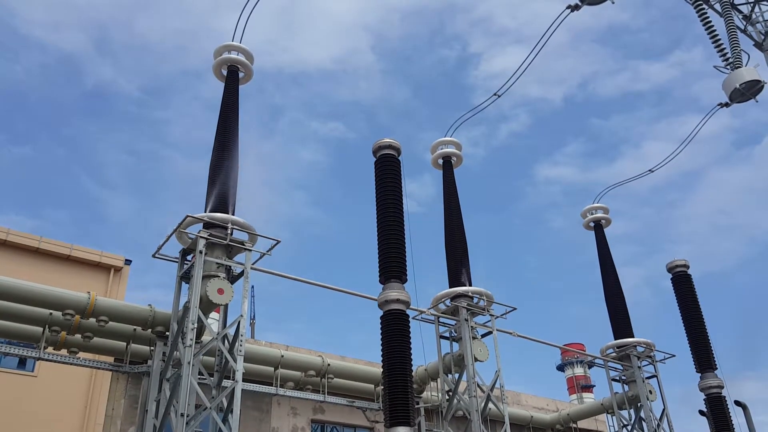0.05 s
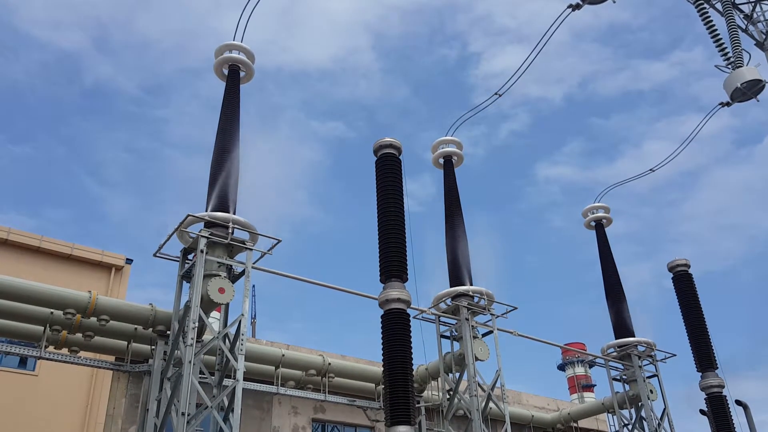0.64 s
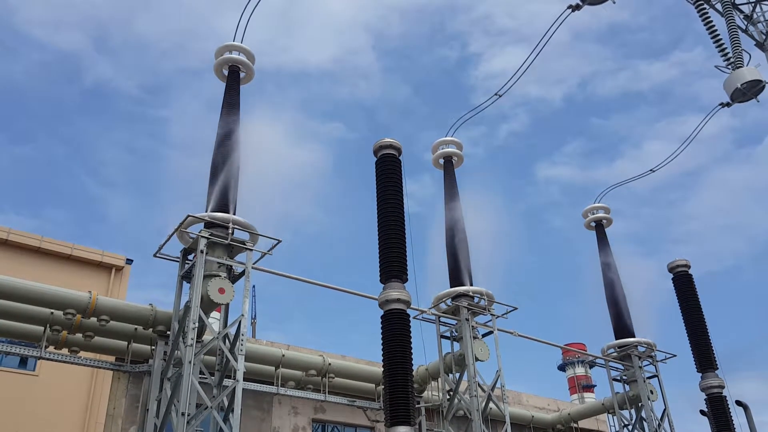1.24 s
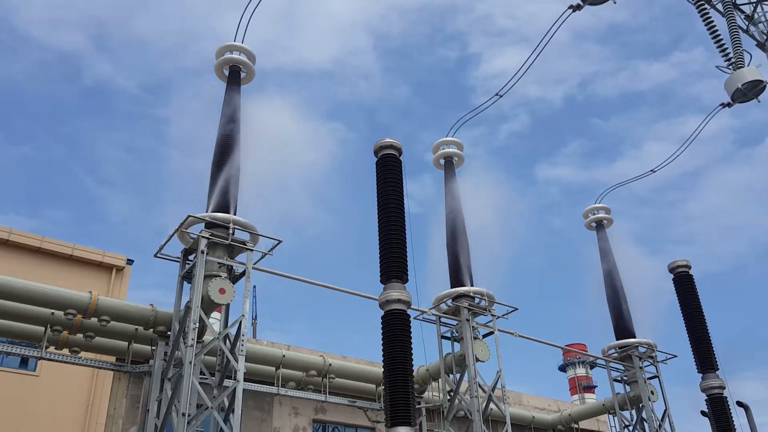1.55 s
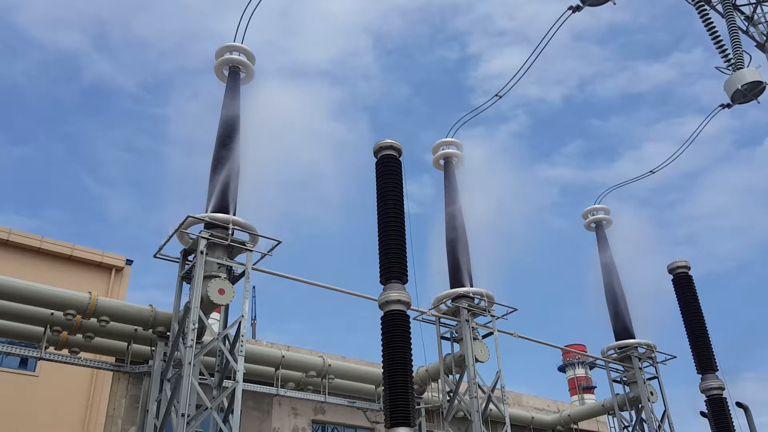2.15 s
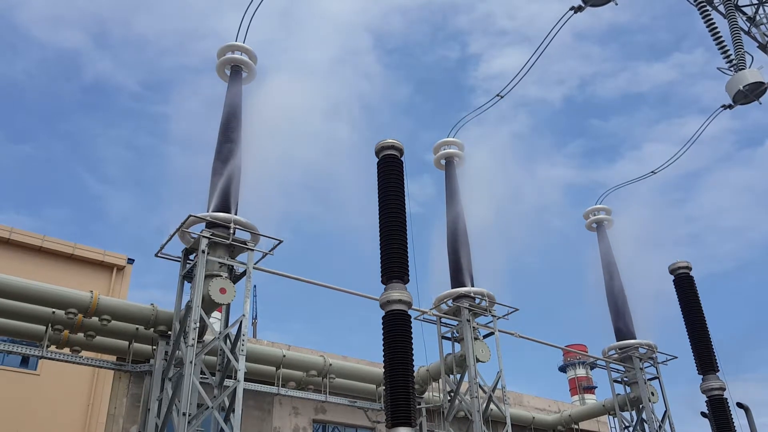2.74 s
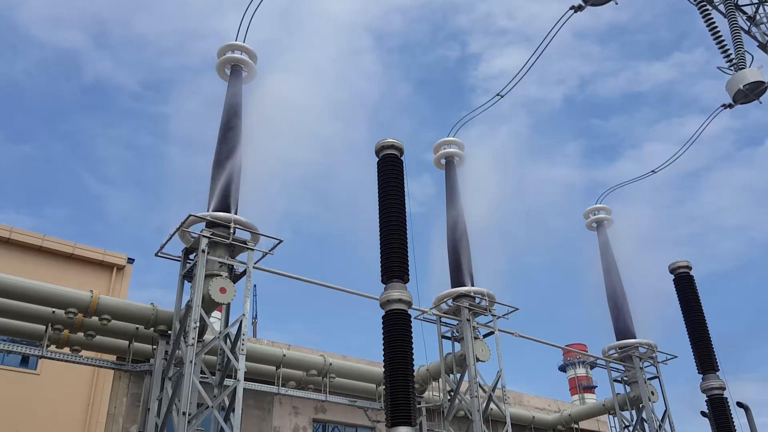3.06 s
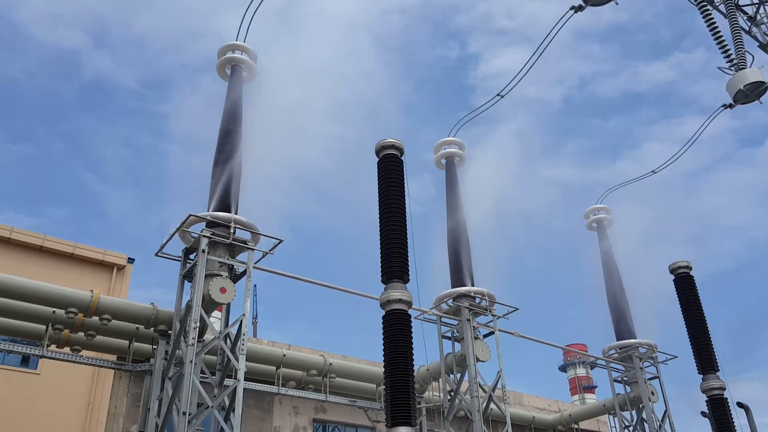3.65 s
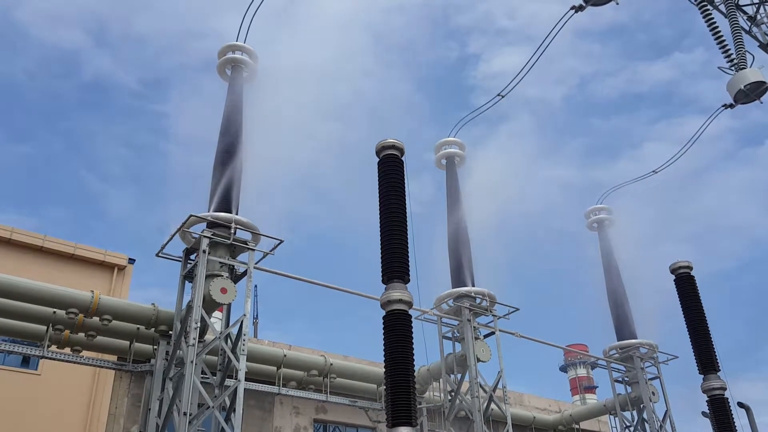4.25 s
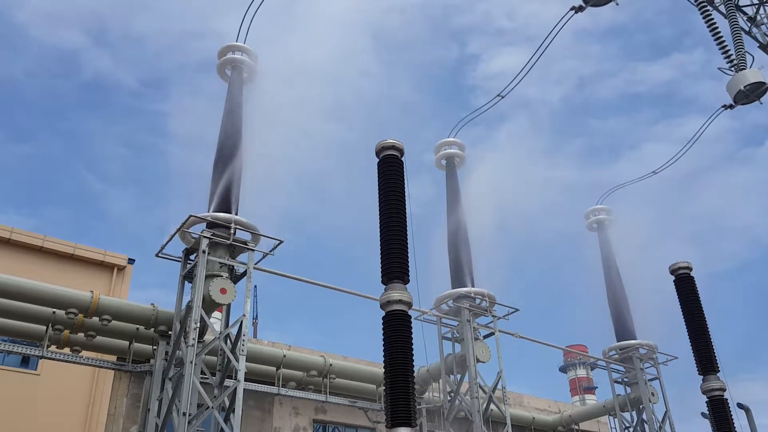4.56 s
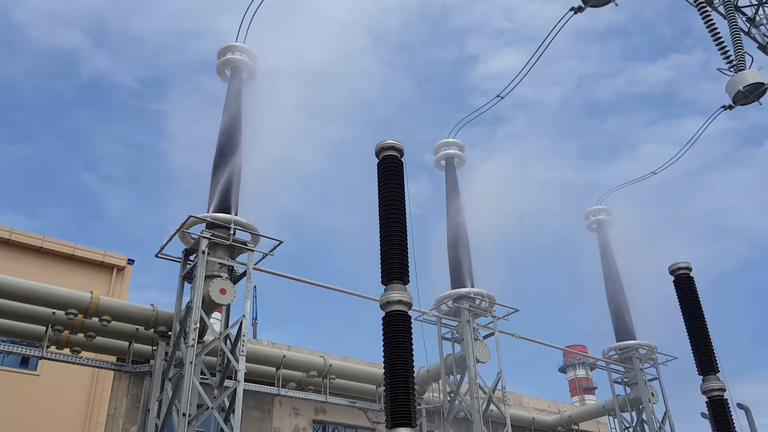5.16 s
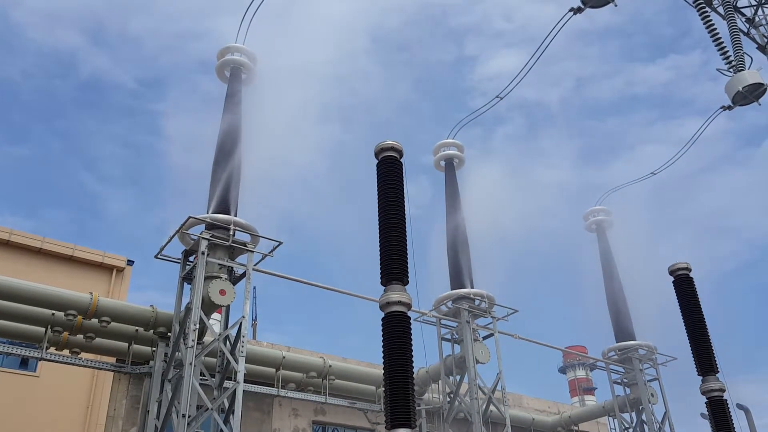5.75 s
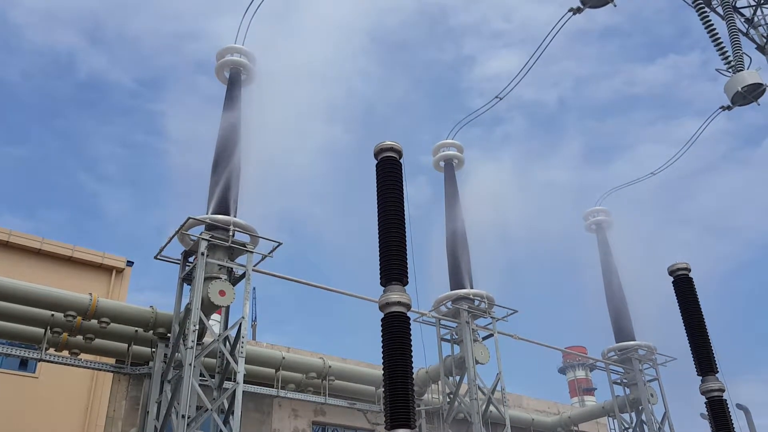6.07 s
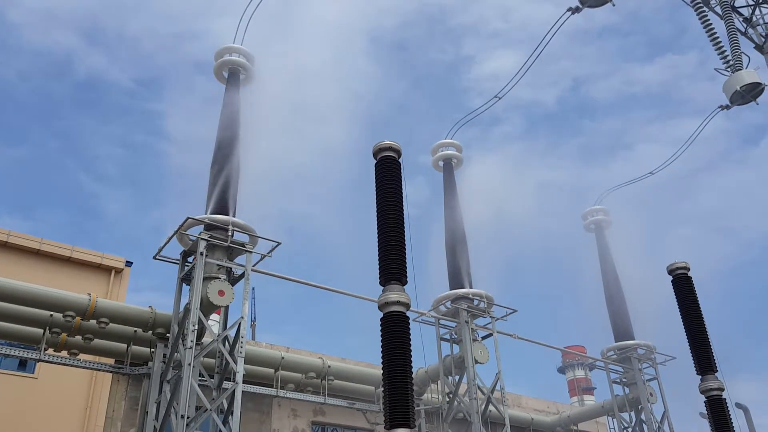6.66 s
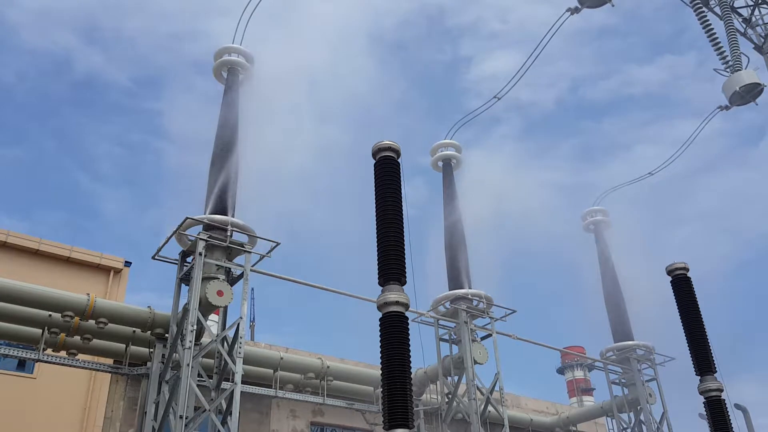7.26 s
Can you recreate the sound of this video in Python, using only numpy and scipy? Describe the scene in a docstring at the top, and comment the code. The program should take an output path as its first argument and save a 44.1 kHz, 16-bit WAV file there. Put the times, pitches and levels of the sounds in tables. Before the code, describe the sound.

A throbbing pump engine and low rumble outdoors, as nozzles blow whistling air, sputter, then settle into a steady hiss of water mist.

```python
"""Live-line washing in an outdoor switchyard

Fixed nozzles start to spray tall insulators. A slow pump engine throbs throughout and beats against
a deep hum, over thin whines and the rumble of plant and wind. The nozzles first blow whistling air,
then sputter and spit as the water arrives, and settle into an even hiss of mist with a breathy tone.
Early echoes from the steelwork ripple the hiss."""
import sys
import numpy as np
from scipy import signal
from scipy.fft import rfft, irfft
from scipy.io import wavfile

SR = 44100
rng = np.random.default_rng(int(sys.argv[2]) if len(sys.argv) > 2 else 0)


def wav_out(sig):
    """Save sig, one row per channel (or a flat mono array), as 16-bit PCM at SR to the path in sys.argv[1]."""
    wavfile.write(sys.argv[1], SR, np.round(np.clip(np.atleast_2d(sig).T, -1, 1) * 32767).astype(np.int16))


N = 326781
T = np.arange(N) / SR
HZ = np.maximum(np.fft.rfftfreq(N, 1 / SR), 1)
CYCLE_HZ, STRONG_STROKE_S = 8.3425, 0.044   # engine cycle rate; time of the first strong stroke


def from_db(db):
    """Amplitude ratio of a level in decibels."""
    return 10 ** (np.asarray(db) / 20)


def rms_one(x):
    """Normalisation to unit rms."""
    return x / np.sqrt(np.mean(x ** 2) + 1e-20)


def over_hz(points):
    """Linear interpolation of a table over log frequency."""
    hz, value = np.transpose(points)
    return np.interp(np.log(HZ), np.log(hz), value)


def drift(corner_hz):
    """Random fluctuation: low-passed noise of unit rms."""
    step, run_in = 40, 2000
    pole = np.exp(-2 * np.pi * corner_hz * step / SR)
    white = rng.standard_normal(N // step + run_in + 2)
    slow = signal.lfilter([1], [1, -2 * pole, pole * pole], white)[run_in:]
    return np.interp(np.arange(N) / step, np.arange(len(slow)), rms_one(slow))


def swell(full_s, attack_s, hold_s, release_s):
    """Envelope with a Gaussian rise, a hold at one and an exponential decay."""
    early, late = np.maximum(full_s - T, 0), np.maximum(T - full_s - hold_s, 0)
    return np.exp(-(early / attack_s) ** 2 - late / release_s)


def resonances(modes):
    """Frequency response of steep resonances that add in power."""
    peaks = [from_db(db) * rms_one(1 / (1 + ((HZ - hz) / width) ** 2)) for hz, width, db in modes]
    return np.sqrt(np.sum(np.square(peaks), axis=0))


def noise(gain):
    """Coloured stereo noise, coherent only at long wavelengths; the channels' mean has unit rms."""
    # likeness of the two microphone ports: frequency_hz, correlation
    likeness = [(100, .99), (180, .97), (270, .94), (450, .77), (740, .48), (1200, -.19), (2000, .03),
                (3300, -.08), (6000, 0)]
    alike = over_hz(likeness)
    mid, side = (rng.standard_normal((2, len(HZ))) + 1j * rng.standard_normal((2, len(HZ)))) * gain
    out = irfft(np.sqrt(1 + alike) * mid + np.sqrt(1 - alike) * side * [[1], [-1]], N)
    return out / np.std(out.mean(axis=0))


def engine(scatter_hz=150, waver_s=0.000092, unsteady_db=0.6):
    """Superposition: low harmonics add into one stroke a cycle; reflections scatter the higher ones."""
    # harmonics of the pump engine's cycle: order, level_db
    harmonics = [(2, -56), (3, -52), (4, -42), (5, -39), (6, -44.5), (7, -28), (8, -42.5), (9, -43),
                 (10, -43), (11, -43), (12, -35), (13, -33.3), (16, -45), (19, -42.5), (20, -46.5),
                 (21, -45.5), (22, -40.3), (23, -44), (24, -50), (25, -39), (26, -49.5), (27, -34.7),
                 (28, -45.5), (29, -38), (32, -41), (34, -48.5)]
    angle = 2 * np.pi * CYCLE_HZ * (T - STRONG_STROKE_S + waver_s * drift(0.51))
    out = np.zeros(N)
    for order, db in harmonics:
        scatter = order * CYCLE_HZ / scatter_hz
        level = from_db(db + unsteady_db * scatter * drift(3.3))
        out += level * np.cos(order * angle + scatter ** 2 * rng.normal())
    return np.sqrt(2) * out


def beating_hum(order=12, beat_s=0.605, in_phase_s=3.1, unsteady_db=0.8, wander_rad=0.2):
    """Beats: a second machine hums just below an engine harmonic, so the bass swells and fades."""
    # strength of the hum: time_s, level_db
    strength = [(0, -41), (.6, -31.5), (1.3, -34), (1.8, -27), (2.25, -61), (2.7, -52), (3.05, -25),
                (3.5, -36.5), (4.4, -32), (4.95, -26.5), (5.6, -30), (6.5, -47), (7.35, -28.5)]
    turns = order * CYCLE_HZ * (T - STRONG_STROKE_S) - (T - in_phase_s) / beat_s
    level = from_db(np.interp(T, *np.transpose(strength)) + unsteady_db * drift(5.5))
    return np.sqrt(2) * level * np.cos(2 * np.pi * turns + wander_rad * drift(0.9))


def motors(wander_rad=0.65):
    """Phase modulation: moving air shakes the thin whines of the machinery."""
    # steady whines: pitch_hz, level_db
    whines = [(196.5, -55), (348.3, -52.5), (393, -47), (1152, -60.5), (2132, -68), (2439, -67),
              (2830, -70), (4122, -68)]
    out = np.zeros((2, N))
    for hz, db in whines:
        wander = wander_rad * np.array([drift(4.2), drift(8.0)])
        out += from_db(db) * np.sin(2 * np.pi * hz * T + wander)
    return np.sqrt(2) * out


def rumble(level_db=-28.0, gust_db=0.24):
    """Broadband noise from plant and wind, with its power mostly at low frequencies."""
    # spectrum of the rumble: frequency_hz, relative_density_db
    spectrum = [(20, -24), (30, -18), (50, -11), (60, -7), (75, -6.5), (86, -4), (97, 2.5), (108, -2.5),
                (133, .3), (160, -5.5), (180, -4.5), (197, -.5), (215, -5), (245, -7), (300, -6),
                (345, -10.5), (410, -11), (480, -9.2), (545, -11.2), (600, -11.2), (720, -15.3), (950, -19),
                (1300, -31.5), (2500, -48.5)]
    return from_db(level_db - gust_db * drift(0.96)) * noise(from_db(over_hz(spectrum)))


def mist(level_db=-42.0, fresh_db=1.9, settle_s=1.8, flutter_db=0.41):
    """Spray noise: an even hiss whose level relaxes exponentially as the sprays settle."""
    # spectrum of the mist: frequency_hz, relative_density_db
    spectrum = [(500, -3.5), (1050, 4), (1280, 6.5), (1550, 4), (2050, 2.5), (2500, -3.5), (2900, -2),
                (3500, -1.5), (4100, -3), (4400, -9), (4950, -7), (7000, -11.5), (8800, -13.5),
                (10300, -21), (11700, -19), (13000, -23), (15800, -23)]
    level = from_db(level_db + fresh_db * np.exp(-T / settle_s) + flutter_db * drift(5.6))
    return level * noise(from_db(over_hz(spectrum)))


def singing_jets(level_db=-58.5, pitch_hz=3830, width_hz=200, wander_hz=70):
    """Frequency modulation: the jets sing in a breathy band that wanders with the pressure."""
    band = signal.hilbert(noise(resonances([(pitch_hz, width_hz, 0)])))
    glide = np.exp(2j * np.pi * np.cumsum(wander_hz * drift(3.0)) / SR)
    return from_db(level_db) * np.real(band * glide)


def venting_air(level_db=-37, full_s=0.17, water_arrives_s=0.74, flutter_db=2.8, sag_db_per_s=3.0):
    """Jet noise sinks with the air pressure; each nozzle resonance whistles until water fills it."""
    # spectrum of the air driven out ahead of the water: frequency_hz, relative_density_db
    spectrum = [(200, 0), (450, 12.5), (590, 7), (750, -4), (1200, -2), (1900, 2), (2500, -1.5), (3000, -1),
                (4050, 1), (4500, -9.5), (6000, -11.5), (9000, -15), (10500, -21), (15800, -28)]
    # nozzle whistles: pitch_hz, width_hz, level_db, peak_s, half_length_s
    whistles = [(930, 47, -47, 0.27, 0.27), (1170, 21, -47, 0.22, 0.34), (1675, 52, -49.5, 0.24, 0.4),
                (1850, 89, -47.5, 0.23, 0.5), (2142, 12, -45.5, 0.33, 0.22), (2710, 25, -59, 0.46, 0.82),
                (2826, 65, -50, 0.45, 0.63), (3460, 200, -57, 0.4, 0.45), (3930, 90, -58, .4, 0.7),
                (4200, 64, -53, .3, 0.54)]
    flow = swell(full_s, attack_s=0.36, hold_s=water_arrives_s - full_s, release_s=0.32)
    level = from_db(level_db - sag_db_per_s * T + flutter_db * drift(12.0))
    out = flow * level * noise(from_db(over_hz(spectrum)))
    for hz, width, db, peak_s, half_s in whistles:
        envelope = from_db(db) * np.exp(-((T - peak_s) / half_s) ** 2)
        out += envelope * noise(resonances([(hz, width, 0)]))
    return out


def droplets(rate_hz=2500):
    """Shot noise: stereo clicks of uneven size from water tearing into drops."""
    born = rng.random((2, N)) < rate_hz / SR
    return rng.standard_normal((2, N)) * born


def sputtering(grain=0.42, lumpy_db=3.0, crackle_db=1.0, attack_s=0.003, tail_s=0.0082):
    """Two-phase flow: air tears water into grainy surges; slugs excite nozzle and pipe resonances."""
    # spectrum of tearing water: frequency_hz, relative_density_db
    spectrum = [(700, 6.5), (1600, 8.5), (2500, -1), (3400, 8.5), (4500, -3), (5500, 2.5), (7500, -1.5),
                (9200, -0.5), (10400, -9.5), (11700, -6.5), (13200, -7), (15800, -12.5)]
    # air and water leaving together: full_s, level_db, attack_s, hold_s, release_s
    surges = [(.42, -44.5, 0.4, 0.26, 0.13), (0.99, -49, 0.017, .02, .02),
              (1.254, -42.5, 0.067, 0.14, 0.12), (1.683, -50, 0.096, 0.046, 0.22),
              (2.15, -53, .25, .25, .8)]
    # slugs spat from a nozzle: start_s, level_db, length_s, nozzle_power_share, pipe_power_share
    spits = [(0.345, -46, .014, .4, 0.1), (0.436, -46, 0.048, 0.9, 0.05), (.515, -46, 0.016, .7, 0),
             (.552, -46, .01, .6, 0), (0.594, -43.5, 0.022, .8, 0), (0.63, -45, 0.018, .8, 0),
             (0.683, -50, .015, .8, 0), (.745, -49, .012, .5, 0), (1.19, -41.5, 0.015, 0, 0.3),
             (1.234, -40, 0.026, 0, 0.5), (1.284, -42.5, 0.06, 0, 0.03), (1.348, -40.5, 0.025, 0.1, 0.05),
             (1.392, -38.5, .014, 0, 0.1), (1.578, -49, .014, .2, 0), (1.629, -41, 0.011, 0, 0),
             (1.68, -45.5, .014, 0, 0), (1.893, -48, .008, .4, 0), (2.078, -40, .009, 0.6, 0),
             (2.118, -44.5, .012, 0.8, 0), (2.181, -42, 0.015, 0.6, 0.04), (2.222, -40, 0.015, 0.35, 0.2),
             (2.325, -41, 0.011, 0.35, 0.3), (2.362, -47, 0.011, 0.7, 0.1), (2.444, -46, 0.01, .9, 0),
             (2.478, -45.5, .008, 1, 0.1), (2.594, -37, 0.012, 0.1, 0), (2.733, -48, .012, .6, 0),
             (2.798, -39, 0.016, 0.06, .45), (2.863, -49, .005, .3, 0), (2.939, -38, 0.0084, 0.18, 0.45),
             (2.987, -48, .008, .8, 0), (3.24, -48, .012, 0.4, .2)]
    # hollow ring of a spitting nozzle: pitch_hz, width_hz, relative_level_db
    nozzle_modes = [(5770, 580, 4), (8900, 550, 3), (11540, 400, -3)]
    # lower ring of the feed pipe, excited by heavier slugs: pitch_hz, width_hz, relative_level_db
    pipe_modes = [(3350, 300, 1), (3970, 280, 3), (5500, 150, -8), (6500, 200, -3)]
    colour = from_db(over_hz(spectrum))
    grains = rms_one(irfft(rfft(droplets()) * colour, N))
    tearing = noise(colour) + grain * grains
    surging = np.linalg.norm([from_db(db) * swell(s, *shape) for s, db, *shape in surges], axis=0)
    broadband = surging * from_db(lumpy_db * drift(22))
    in_nozzle, in_pipe = np.zeros((2, N))
    crackle = from_db(crackle_db * drift(160))
    for start_s, db, length_s, nozzle_share, pipe_share in spits:
        rise = np.clip((T - start_s) / attack_s, 0, 1)
        decay = np.exp(-np.maximum(T - start_s - length_s, 0) / tail_s)
        burst = crackle * from_db(db) * rise * decay
        plain_share = max(1 - nozzle_share - pipe_share, 0)
        broadband = np.hypot(broadband, np.sqrt(plain_share) * burst)
        in_nozzle += np.sqrt(nozzle_share) * burst
        in_pipe += np.sqrt(pipe_share) * burst
    pipe_ring = noise(resonances(pipe_modes))
    snap = from_db(-15.0) * noise(resonances([(14200, 2000, 0)]))   # bright edge of the heavier slugs
    return broadband * tearing + in_nozzle * noise(resonances(nozzle_modes)) + in_pipe * (pipe_ring + snap)


def air_pockets():
    """Transient flow noise: a band of hiss swells and dies as a pocket of air passes a nozzle."""
    # brief rushes and squeals: peak_s, half_length_s, centre_hz, half_width_hz, level_db
    rushes = [(0.29, .075, 14020, 130, -58), (.26, .11, 13450, 200, -60), (0.792, .08, 3500, 800, -47),
              (1.251, 0.0098, 1480, 550, -38.5), (1.342, 0.058, 1590, 380, -40.5),
              (1.35, .07, 13300, 1100, -57), (1.72, 0.032, 3750, 550, -48.5), (2.12, 0.085, 3700, 550, -50),
              (3.24, .04, 3700, 450, -50.5), (3.425, .05, 3530, 480, -47), (4.65, 0.1, 3880, 700, -51),
              (6.02, .04, 5500, 1800, -54), (6.604, .07, 3800, 1100, -50)]
    out = np.zeros((2, N))
    for peak_s, half_s, hz, width, db in rushes:
        near = np.abs(T - peak_s) < 4 * half_s
        band = signal.butter(1, [hz - width, hz + width], "band", fs=SR, output="sos")
        hiss = signal.sosfilt(np.vstack([band, band]), rng.standard_normal((2, N))[:, near])
        envelope = from_db(db) * np.exp(-((T[near] - peak_s) / half_s) ** 2)
        out[:, near] += envelope * np.sqrt(2) * rms_one(hiss)
    return out


def steelwork(x, echo_db=-18.0, count=8, delay_range_s=(0.001008, 0.012)):
    """Comb filtering: early echoes from masts and pipes, different at each port, ripple the hiss."""
    out = x.copy()
    for side in range(2):
        for lag in (rng.uniform(*delay_range_s, count) * SR).astype(int):
            out[side, lag:] += from_db(echo_db) * x[side, :-lag]
    return out / np.sqrt(1 + count * from_db(echo_db) ** 2)


def scene():
    """Superposition of the machinery below and the nozzles above."""
    nozzles = steelwork(mist() + venting_air() + air_pockets()) + singing_jets() + sputtering()
    return engine() + beating_hum() + motors() + rumble() + nozzles


def record(dry, cutoff_hz=15850, bass_turn_hz=54):
    """Microphone response: treble shadowing on the right, a steep low-pass and phase lead in the bass."""
    # balance of the two ports: frequency_hz, left_minus_right_db
    balance = [(60, -2.5), (400, -1.5), (1100, 0.5), (1900, -2), (2550, 2), (3750, -5.5), (4500, 1),
               (5500, -3), (6500, 7), (7400, 11), (9000, 20), (10400, 15), (11600, 18), (13000, 9),
               (15300, 7)]
    ports = from_db(over_hz(balance) * np.array([[0.5], [-0.5]]))
    ports = ports / np.sqrt(np.mean(ports ** 2, axis=0))
    low_pass = 1 / np.sqrt(1 + (HZ / cutoff_hz) ** 400)
    phase_lead = np.exp(1j * bass_turn_hz / HZ)   # turns each thump into a push and a pull
    return irfft(rfft(dry) * ports * low_pass * phase_lead, N)


dry = scene()
out = record(dry)
wav_out(out)
```